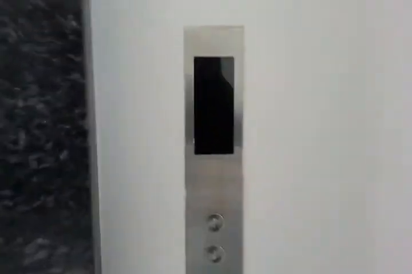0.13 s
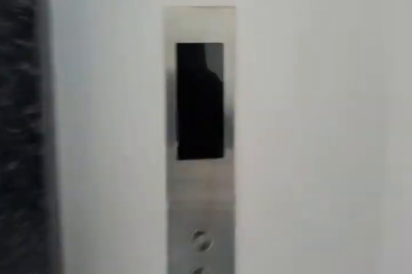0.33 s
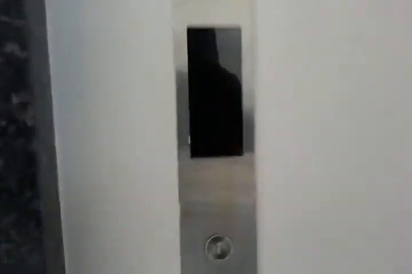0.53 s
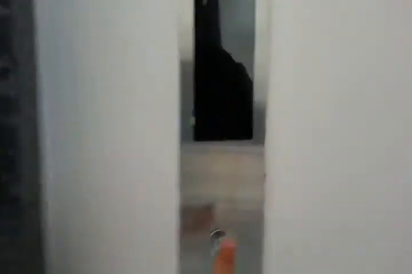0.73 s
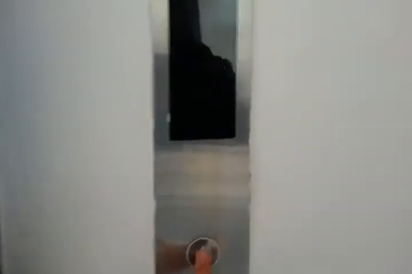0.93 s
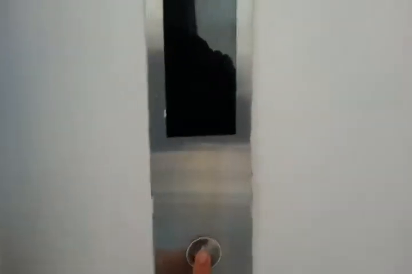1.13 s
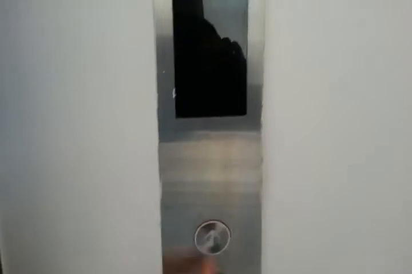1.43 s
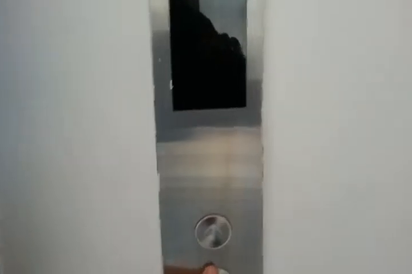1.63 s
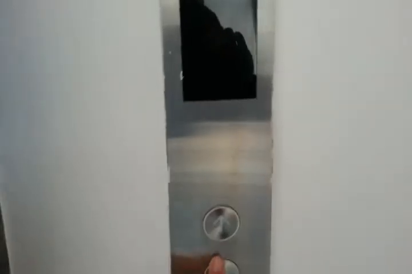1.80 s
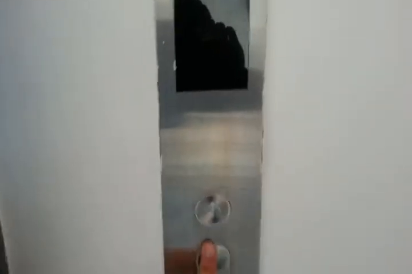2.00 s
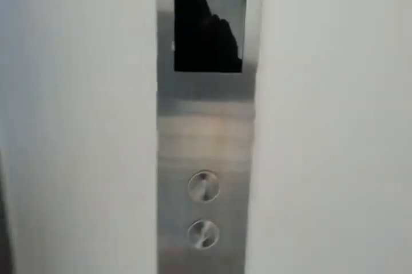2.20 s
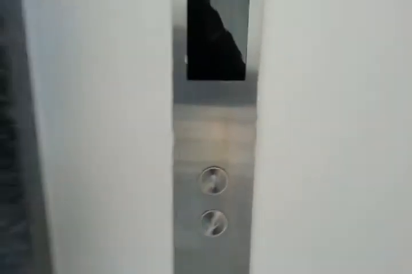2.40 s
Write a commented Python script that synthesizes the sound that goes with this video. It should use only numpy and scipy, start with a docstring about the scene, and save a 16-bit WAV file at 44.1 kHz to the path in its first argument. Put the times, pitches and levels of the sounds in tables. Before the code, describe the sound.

A finger clicks two metal lift buttons in a quiet hall, after sharp handling ticks and rustle

```python
"""A finger presses two lift call buttons in a thin steel panel, close to a hand-held phone in a quiet hall.
Cloth and skin rustle (shaped noise) as the arm reaches; the grip shifts and the case ticks and creaks
(resonated snaps, low noise). Then knocks and rubbing excite the panel's modes, the button clicks, scrapes
and gives soft puffs of hiss (tilted noise bursts) and the wall plate thumps (decaying sines). The rustle
goes on as the arm draws back, and faint hall air (coloured noise) lies under it all."""
import sys
import numpy as np
from scipy import signal
from scipy.fft import rfft, irfft
from scipy.io import wavfile
from scipy.ndimage import uniform_filter1d

SR = 44100
rng = np.random.default_rng(int(sys.argv[2]) if len(sys.argv) > 2 else 0)


def gain_from_db(level_db):
    """Turn a decibel level (scalar or array-like) into a linear amplitude factor."""
    decades = np.asarray(level_db, float) / 20
    return 10 ** decades


def unload_wav(signal):
    """Save mono or channel-first audio to the path in sys.argv[1] as 16-bit WAV at rate SR, clipped to [-1, 1]."""
    wavfile.write(
        sys.argv[1],
        SR,
        np.round(np.clip(np.atleast_2d(signal).T, -1, 1) * 32767).astype(np.int16),
    )


N = 112454
T = np.arange(N) / SR

# modes of the steel panel: (frequency [Hz], level [dB])
PANEL_MODES = [(190, 2), (248, 1), (305, 0.5), (480, -6.5), (835, -2), (980, -3.5), (1520, 4.5),
               (2700, 2.5), (3600, 6.5)]
# resonances of the left and right microphone port: (frequency [Hz], bandwidth [Hz])
MIC_PORTS = [(5600, 2500), (7450, 3300)]


def unit(x):
    """Normalisation: scale to rms 1."""
    return x / np.sqrt(np.mean(x ** 2))


def colour(x, points, tilt_db=0.):
    """Spectral shaping: filter by (Hz, dB) points, with an extra tilt in dB per octave around 3 kHz."""
    hz = np.maximum(np.fft.rfftfreq(x.shape[-1], 1 / SR), 1)
    p = np.array(points)
    db = np.interp(np.log(hz), np.log(p[:, 0]), p[:, 1], left=-90, right=-90)
    db = db + tilt_db * np.log2(hz / 3000)
    return irfft(rfft(x) * gain_from_db(db), x.shape[-1])


def curve(rows):
    """Amplitude envelope: gain along (s, dB) rows, practically silent outside them."""
    p = np.array(rows)
    return gain_from_db(np.interp(T, p[:, 0], p[:, 1], left=-120, right=-120))


def walk(rate_hz):
    """Slow random modulation: normal random levels held 1 / rate_hz and slewed."""
    hold = int(SR / rate_hz)
    steps = np.repeat(rng.standard_normal(N // hold + 1), hold)
    return uniform_filter1d(steps, hold)[:N]


def peak(x, hz, width_hz):
    """Simple resonator: two poles, gain 1 at the centre."""
    return signal.lfilter(*signal.iirpeak(hz, hz / width_hz, SR), x)


def add(out, s, x):
    """Superposition: mix x into out from time s."""
    i = int(s * SR)
    out[..., i:i + x.shape[-1]] += x[..., :N - i]


def pan(db):
    """Level difference between the sides: left and right gains, left louder for positive db."""
    return gain_from_db(np.array([[db / 2], [-db / 2]]))


def panel(force, spot):
    """Modal superposition: higher modes die sooner, and each touch spot shifts and weights them anew."""
    spread_db, detune = 2.5, 0.035  # detune is a fraction of the mode frequency
    ring = 0
    for k, (hz, db) in enumerate(PANEL_MODES):
        t60_s = 0.056 * (250 / hz) ** 0.82
        width_hz = np.log(1000) / np.pi / t60_s  # bandwidth that gives this decay
        mode = peak(force, hz * (1 + detune * spot[k, 1]), width_hz)
        ring = ring + (-1) ** k * gain_from_db(db + spread_db * spot[k, 0]) * mode
    return ring


def knocks():
    """Impact excitation: a push and an equally soft rattle that swells and dies both ring the panel."""
    # finger blows on the panel: (time [s], peak level [dB], contact time [ms])
    blows = [(0.918, -26.5, 3.16), (0.932, -23, 0.28), (1.023, -33, 1.07), (1.069, -35.5, 0.9),
             (1.137, -43.5, 0.74), (1.184, -43.5, 0.58), (1.231, -43.5, 2.8), (1.269, -36.5, 1.02),
             (1.286, -36.5, 0.83), (1.447, -42, 1.64), (1.466, -36, 1.18), (1.554, -37.5, 0.94),
             (1.663, -35, 1.65), (1.891, -39.5, 1.8), (1.928, -48, 1.04), (1.994, -37, 2.07),
             (2.036, -41.5, 1.11), (2.198, -40.5, 2.6), (2.2352, -27.5, 1.03)]
    rattle_rise_s, rattle_t60_s, rattle_db = 0.0021, 0.059, -19.4
    out, t = np.zeros(N), T[:SR // 4]
    shape = (1 - np.exp(-t / rattle_rise_s)) * 1000 ** (-t / rattle_t60_s)
    noises = rng.standard_normal((len(blows), len(t)))
    spots = rng.standard_normal((len(blows), len(PANEL_MODES), 2))
    for (s, db, ms), noise, spot in zip(blows, noises, spots):
        push = np.sin(np.pi * np.minimum(t * 1000 / ms, 1)) ** 2
        rattle = signal.fftconvolve(noise * shape, push)[:len(t)]
        ring = panel(push + gain_from_db(rattle_db) * rattle, spot)
        add(out, s, gain_from_db(db) * ring / np.abs(ring).max())
    return out


def button_noises():
    """Broadband excitation: bursts of decaying noise, tilted dull to bright, also excite the panel modes."""
    # clicks, scrapes and soft puffs of hiss at the button:
    # (time [s], relative level [dB], tilt [dB per octave])
    button_bursts = [(0.9215, -11.5, -4.5), (.932, -30, -21), (1.021, -20, -6.5), (1.2348, -39, -1.5),
                     (1.2685, -28, -2.5), (1.4518, -35, -5), (1.465, -27.5, -4.5), (1.534, -35.5, -1.5),
                     (1.5515, -30, -7.5), (1.727, -46.5, 10), (1.824, -43.5, 11), (1.927, -43, 5),
                     (2.0384, -38, 1), (2.222, -16.5, -5.5), (2.233, -15, 1)]
    # spectrum of a burst before its tilt: (frequency [Hz], gain [dB])
    burst_colour = [(590, -19), (1000, -9.5), (5190, -5.5), (7270, 3), (13900, -11), (16000, -34)]
    t60_s, ring_db = 0.028, -7.5  # ring relative to burst
    burst_pan_db, ring_pan_db = -3, 4
    out, t = np.zeros((2, N)), T[:SR // 5]
    noises = rng.standard_normal((len(button_bursts), 2, len(t)))
    spots = rng.standard_normal((len(button_bursts), len(PANEL_MODES), 2))
    decay = 1000 ** (-t / t60_s) * np.minimum(t / t60_s * 10, 1)
    for (s, db, tilt_db), noise, spot in zip(button_bursts, noises, spots):
        partly_alike = noise[0] + 2 * noise
        burst = unit(colour(partly_alike, burst_colour, tilt_db)) * decay
        ring = gain_from_db(ring_db) * unit(panel(burst[0], spot)) * np.std(burst)
        both = burst * pan(burst_pan_db) + ring * pan(ring_pan_db)
        add(out, s, gain_from_db(db) * both / 2)
    return out


def rub():
    """Friction excitation: the fingertip drags in uneven catches and keeps the panel murmuring."""
    # fingertip rubbing the panel: (time [s], level [dB])
    rub_level = [(.93, -50), (1.22, -55.5), (1.3, -48.5), (1.37, -69.5), (1.615, -57.5), (1.76, -63.5),
                 (1.87, -67.5), (2.05, -61.5), (2.17, -71), (2.27, -49), (2.4, -65.5)]
    top_hz, catch_db = 479, 6
    drag = signal.lfilter(*signal.butter(2, top_hz, fs=SR), rng.standard_normal(N))
    catches = gain_from_db(catch_db * walk(39.72))
    return curve(rub_level) * catches * unit(panel(drag, np.zeros((len(PANEL_MODES), 2))))


def jolts():
    """Damped free vibration: some presses shake the wall plate in a deep, short thump."""
    # thumps of the wall plate: (time [s], initial level [dB])
    thumps = [(0.924, -33), (1.072, -38.5), (1.467, -46), (1.551, -44)]
    plate_hz, t60_s = 82, 0.099
    out, t = np.zeros(N), T[:SR // 4]
    for s, db in thumps:
        add(out, s, gain_from_db(db) * np.sin(2 * np.pi * plate_hz * t) * 1000 ** (-t / t60_s))
    return out


def grip():
    """Structure-borne sound: very short snaps ring each microphone port, beside a low creak of the case."""
    # ticks of the case: (time [s], peak level [dB], left-right difference [dB], pulse time scale [ms])
    ticks = [(0.1484, -40, -28, 0.32), (0.1554, -24.5, -26.5, 0.017), (0.214, -10.5, -14.5, 0.14),
             (0.2529, -5.5, 0, 0.67), (0.2762, -18, -8, 0.42), (0.2838, -24.5, -14, 0.52),
             (0.2872, -31, 11, 0.27)]
    # creak carried through the case: (time [s], level [dB])
    creak_level = [(.122, -86), (.134, -42.5), (.17, -53.5), (.183, -42), (.27, -46), (.292, -38.5),
                   (.305, -53.5), (.37, -67)]
    # spectrum of the creak: (frequency [Hz], gain [dB])
    creak_colour = [(50, -7.5), (240, -1.5), (400, -10), (650, -6.5), (1300, -21.5), (3000, -25)]
    body_hz, body_width_hz, body_db = 2070, 940, -2.5
    cut = 0.37  # a tick lacks tones under this many cycles per pulse time scale
    out, t = np.zeros((2, N)), T[:SR // 50]
    noises = rng.standard_normal((len(ticks), 2, len(t)))
    for (s, db, lr_db, ms), noise in zip(ticks, noises):
        x = t * 1000 / ms
        snap = peak(noise * x * np.exp(-x), 4720, 6560)
        ring = np.array([peak(v, hz, width_hz) for v, (hz, width_hz) in zip(snap, MIC_PORTS)])
        ring = ring + gain_from_db(body_db) * peak(snap, body_hz, body_width_hz)
        low_hz = min(cut * 1000 / ms, SR / 5)
        ring = signal.lfilter(*signal.butter(2, low_hz, "high", fs=SR), ring)
        add(out, s, gain_from_db(db) * pan(lr_db) * ring / np.abs(ring).max(axis=1, keepdims=True))
    middle, side = unit(colour(rng.standard_normal((2, N)), creak_colour))
    creak = middle + 0.5 * side * np.array([[1], [-1]])
    return out + curve(creak_level) * gain_from_db(1.5 * walk(70)) * creak


def rustle():
    """Friction noise: fine-grained hiss of cloth and skin, uncorrelated at the two resonant ports."""
    # cloth and skin rustle: (time [s], level [dB])
    rustle_level = [(0, -55), (.055, -65.5), (.075, -50), (.118, -63), (.135, -49.5), (.295, -48),
                    (.33, -62), (.55, -78.5), (.69, -56.5), (.9, -72.5), (.93, -48.5), (1.2, -56.5),
                    (1.29, -51), (1.36, -71), (2.2, -68), (2.25, -49), (2.55, -53)]
    # spectrum of the rustle: (frequency [Hz], gain [dB])
    rustle_colour = [(290, -32), (500, -1.5), (2800, -7), (7060, -4.5), (13800, -13.5), (15000, -40)]
    grains = rng.standard_normal((2, N)) * gain_from_db(1.3 * walk(300))
    grains = colour(grains, rustle_colour)
    ported = np.array([peak(v, hz, width_hz) for v, (hz, width_hz) in zip(grains, MIC_PORTS)])
    return curve(rustle_level) * unit(grains + 1.7 * ported)


def hall():
    """Spatial coherence of hall air and microphone hiss: bass much alike on both sides, treble unrelated."""
    # spectrum of the air and hiss: (frequency [Hz], gain [dB])
    air_colour = [(26, 5), (240, -4.5), (1520, -20.5), (7430, -27), (14600, -25)]
    level_db, alike_below_hz = -66, 790
    middle, side = colour(rng.standard_normal((2, N)), air_colour)
    side = signal.lfilter(*signal.butter(1, alike_below_hz, "high", fs=SR), side) + 0.24 * side
    return gain_from_db(level_db) * unit(np.array([middle + side, middle - side]))


def echo(bright, thud):
    """Reverberation: convolution with exponentially decaying noise, independent on each side."""
    t60_s, level_db, rise_s, top_hz = 0.18, -7.5, 0.0028, 7600
    t = T[:SR // 2]
    tail = rng.standard_normal((2, len(t))) * 1000 ** (-t / t60_s) * np.minimum(t / rise_s, 1)
    tail = signal.lfilter(*signal.butter(1, top_hz, fs=SR), tail)
    tail /= np.sqrt(np.sum(tail ** 2, axis=1, keepdims=True))
    return gain_from_db(level_db) * signal.fftconvolve(bright + thud / 2, tail, axes=1)[:, :N]


def scene():
    """Arrival-time difference: button sounds reach the right port first, knocks and rubbing reach it slightly
    first too; both echo, the knocks and rubbing more faintly, while the rest adds directly."""
    air_lag = 21  # samples for a button noise to cross the length of the phone
    thud_lag = 4  # samples
    bright = button_noises()
    thud = knocks() + rub()
    left = np.roll(bright[0], air_lag) + np.roll(thud, thud_lag)
    near = np.array([left, bright[1] + thud])
    return near + echo(bright, thud) + jolts() + grip() + rustle() + hall()


def low_pass(x):
    """Removes everything above the highest recorded frequency."""
    return signal.sosfilt(signal.butter(12, 16600, fs=SR, output="sos"), x)


def record(dry):
    """Band limiting: the microphone rolls off both ends of the spectrum."""
    low_hz, top_hz = 50.6, 14800
    low_cut = signal.lfilter(*signal.butter(2, low_hz, "high", fs=SR), dry)
    mix = signal.sosfilt(signal.butter(10, top_hz, fs=SR, output="sos"), low_cut)
    return low_pass(mix)


dry = scene()
out = record(dry)
unload_wav(out)
```